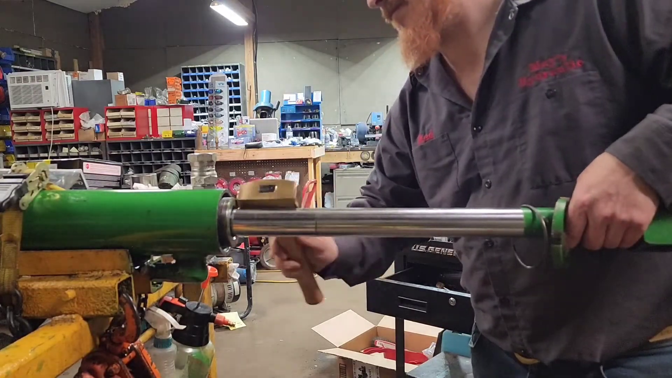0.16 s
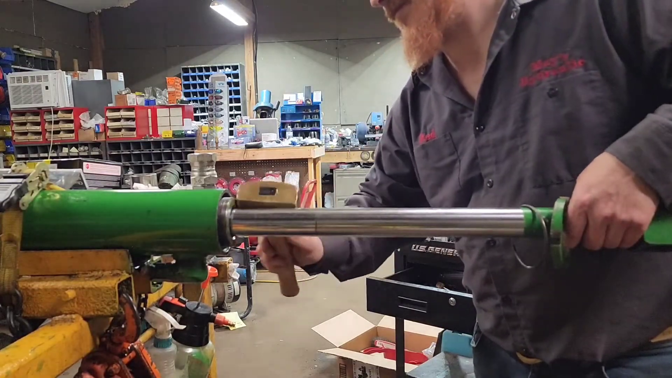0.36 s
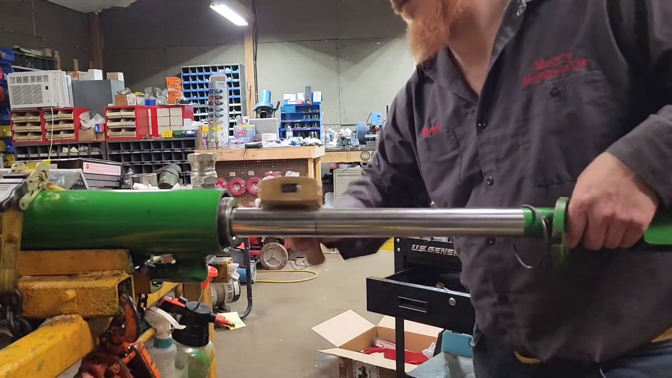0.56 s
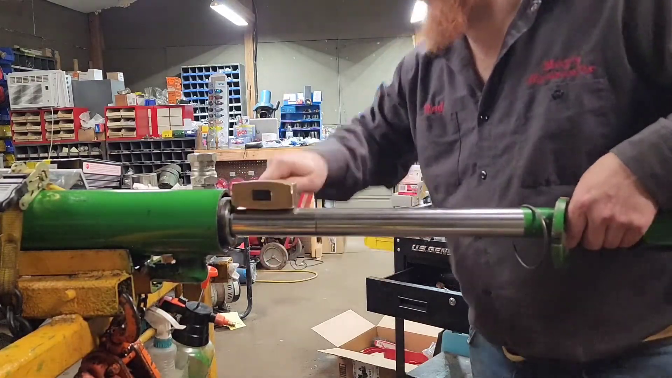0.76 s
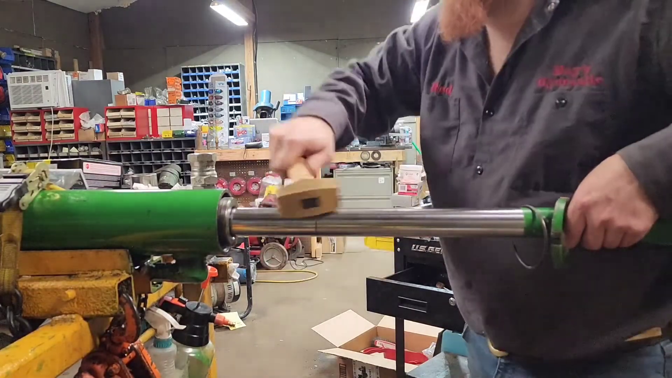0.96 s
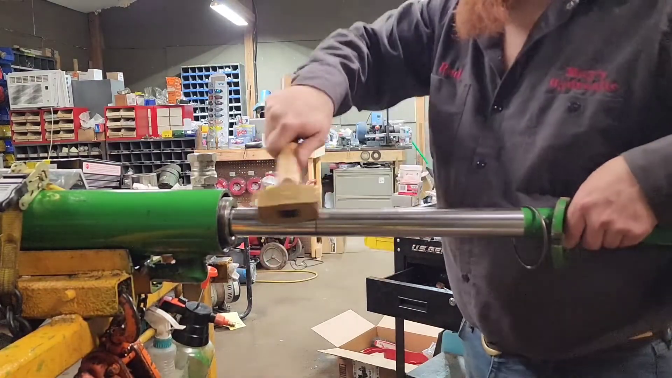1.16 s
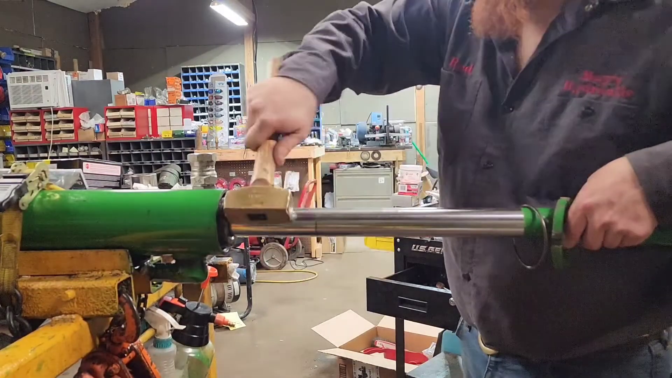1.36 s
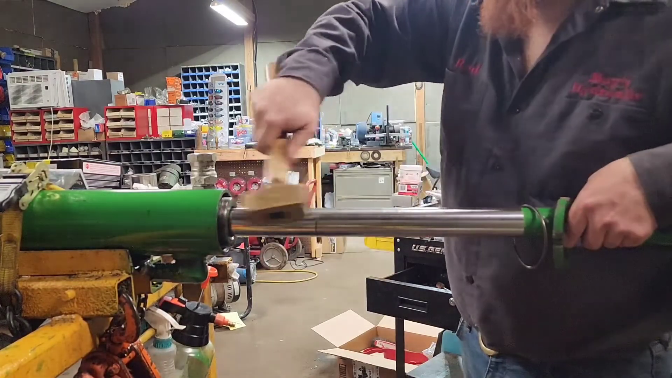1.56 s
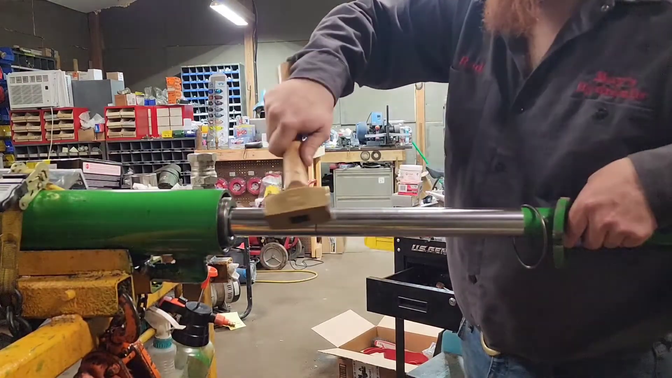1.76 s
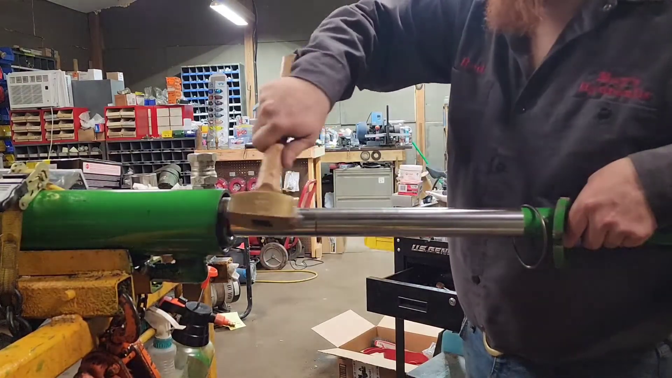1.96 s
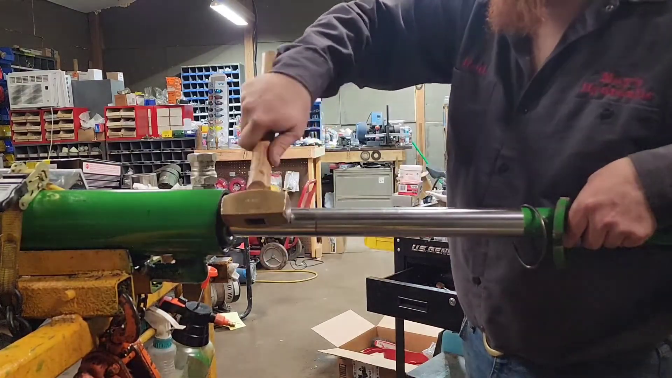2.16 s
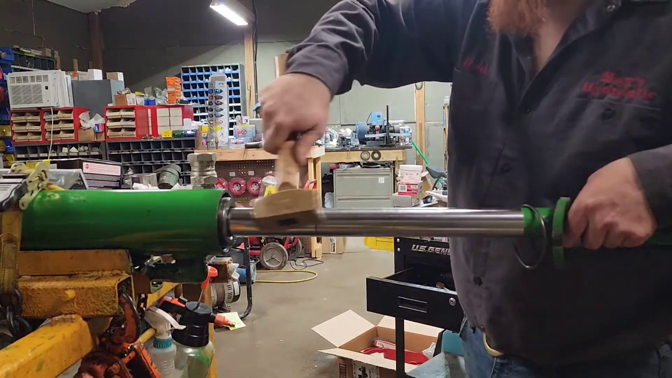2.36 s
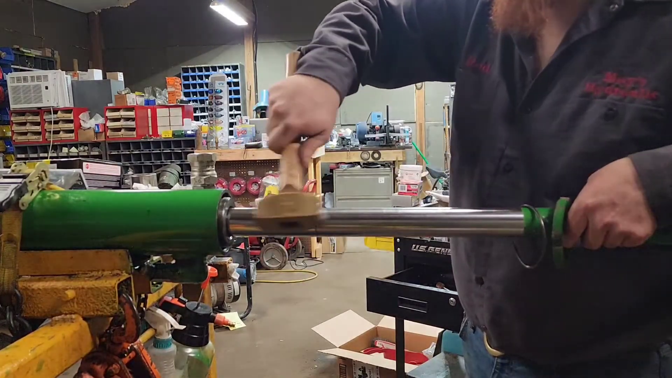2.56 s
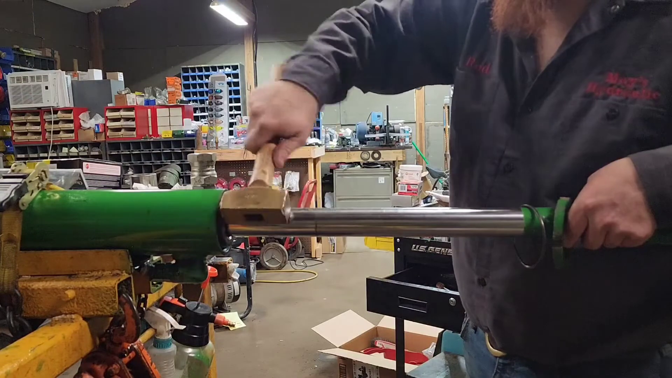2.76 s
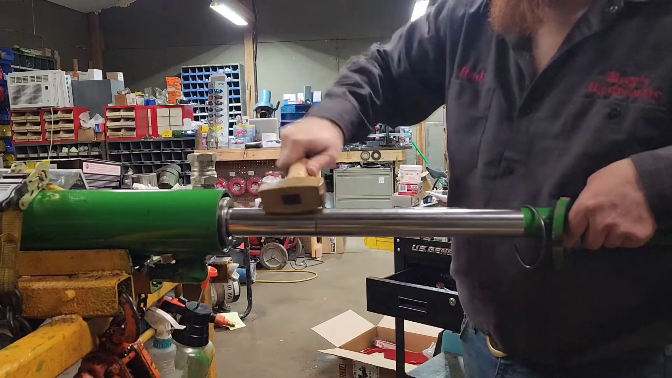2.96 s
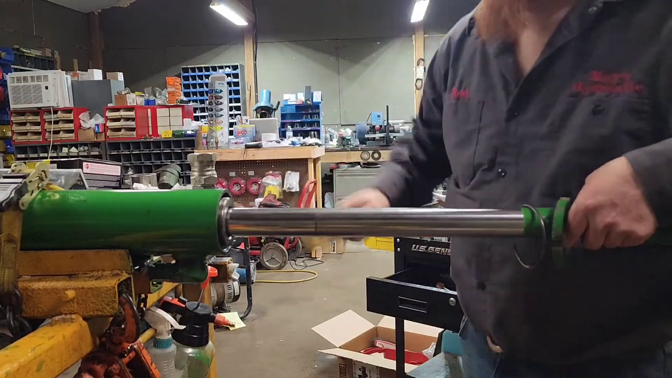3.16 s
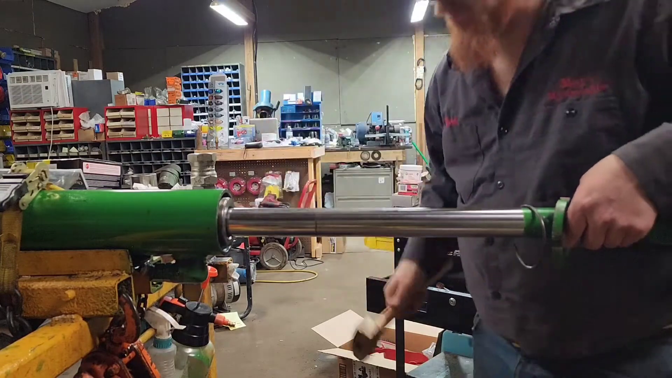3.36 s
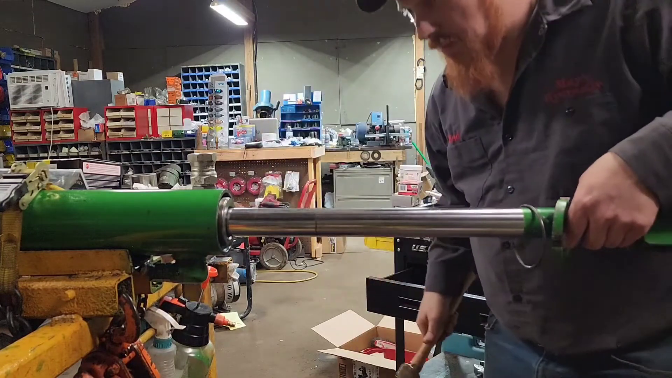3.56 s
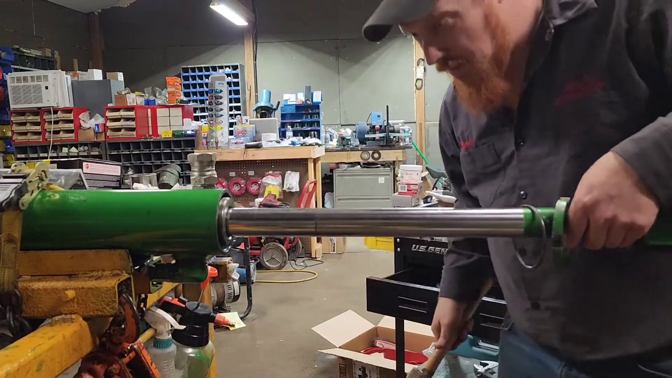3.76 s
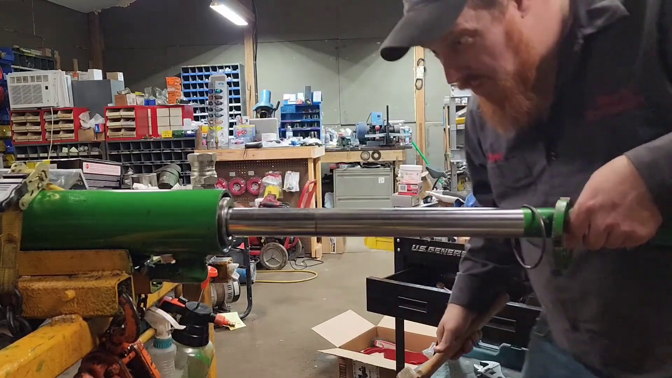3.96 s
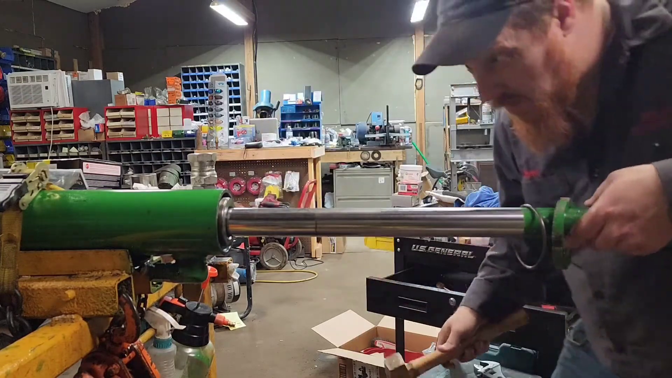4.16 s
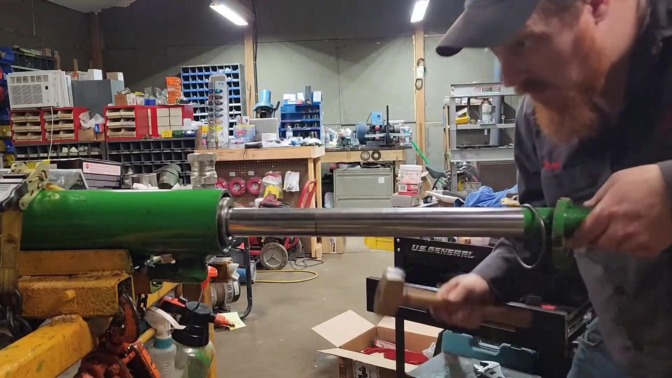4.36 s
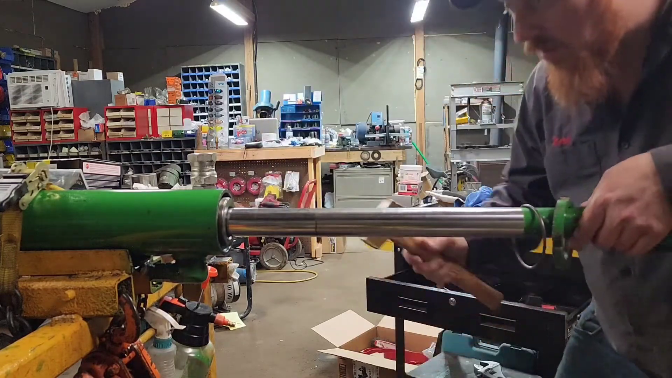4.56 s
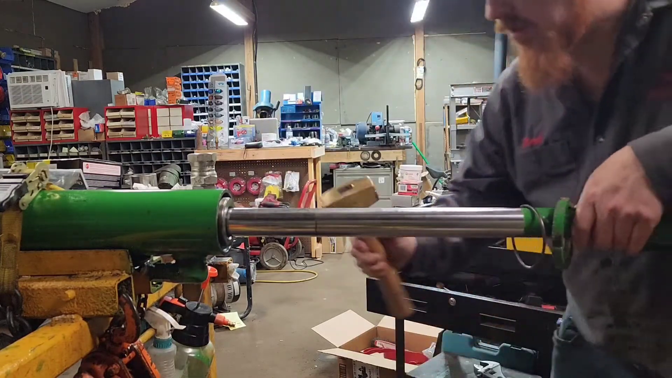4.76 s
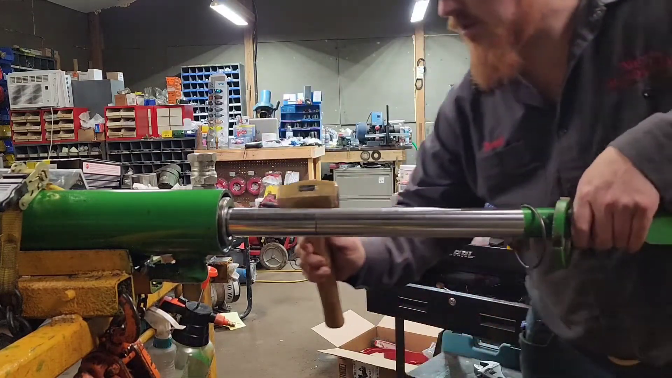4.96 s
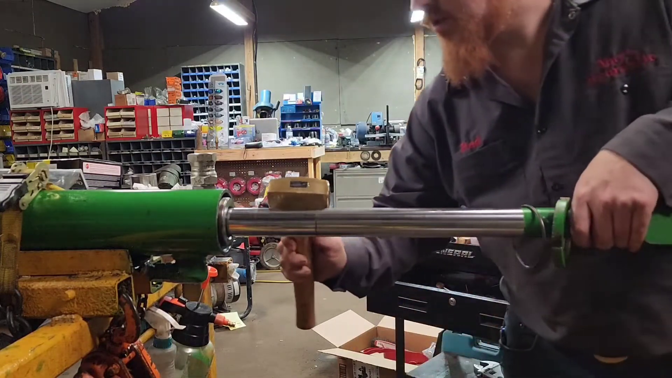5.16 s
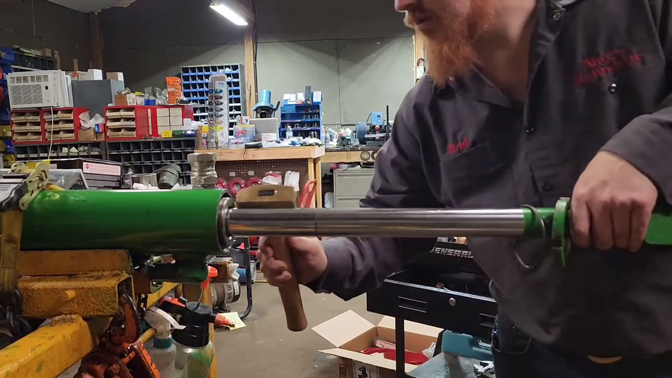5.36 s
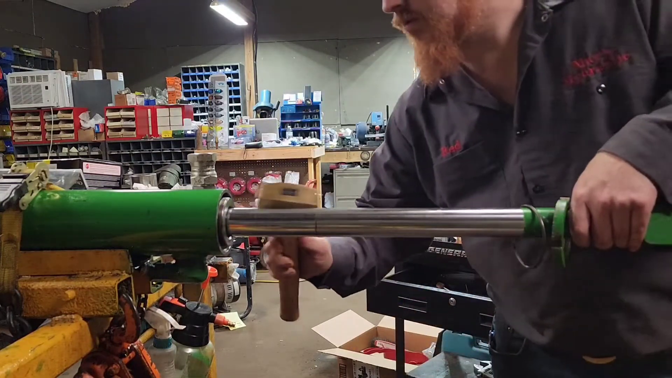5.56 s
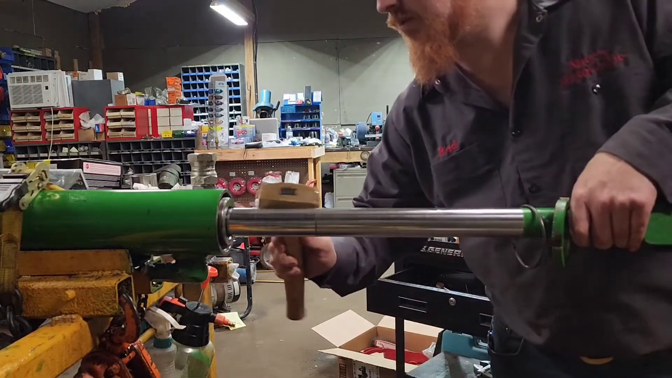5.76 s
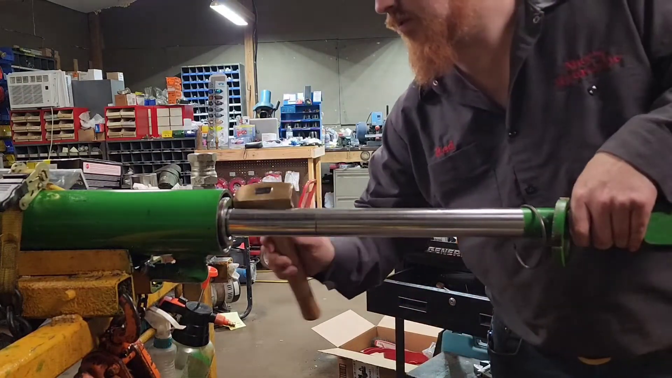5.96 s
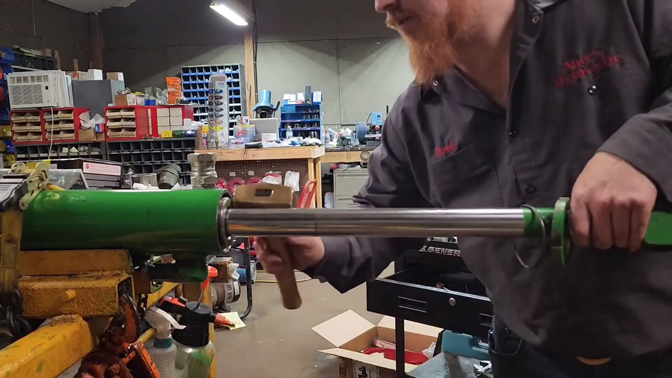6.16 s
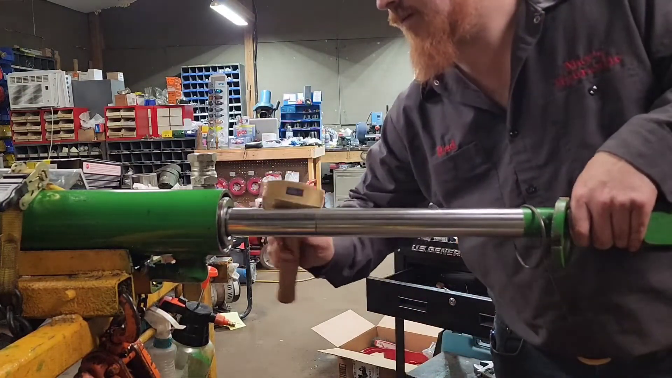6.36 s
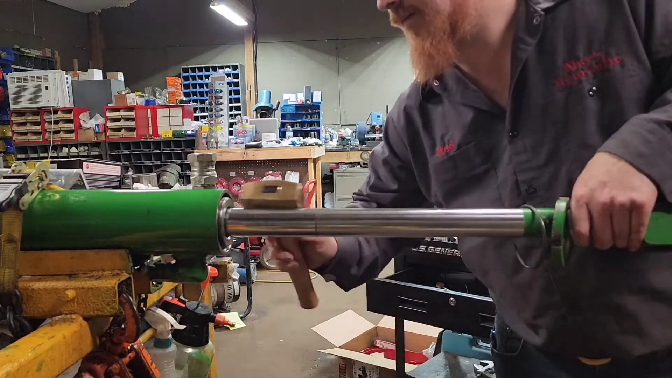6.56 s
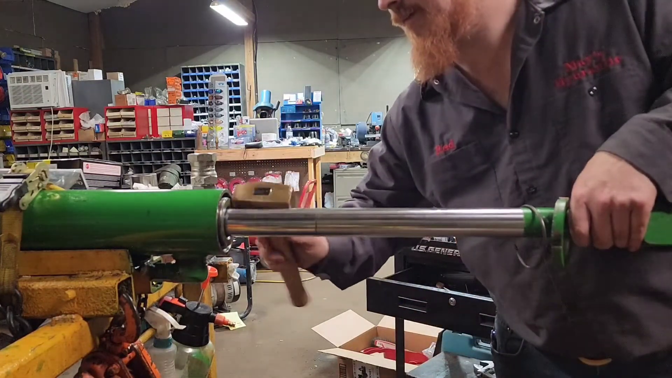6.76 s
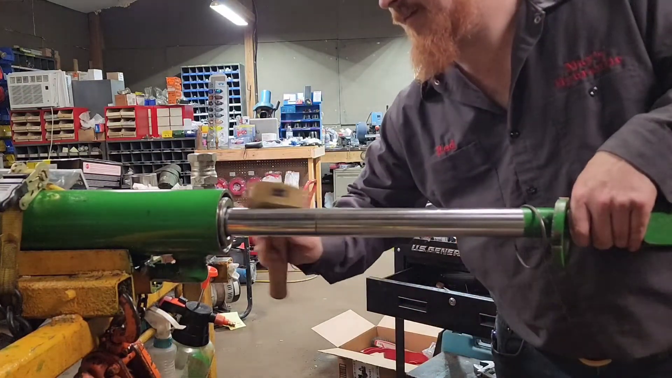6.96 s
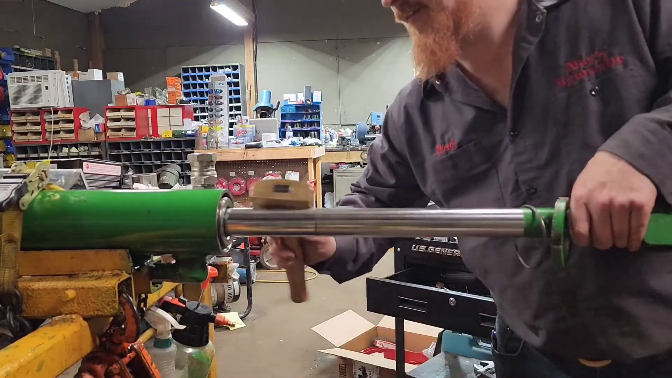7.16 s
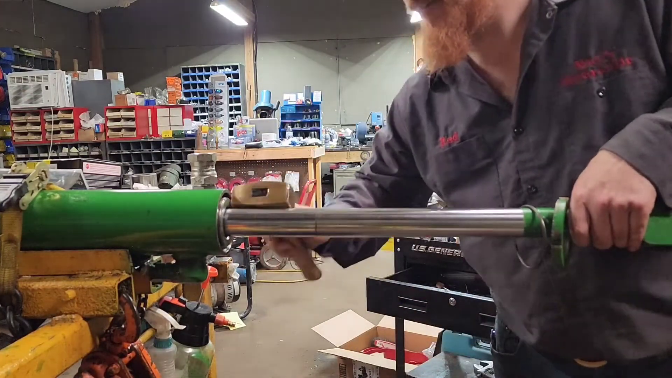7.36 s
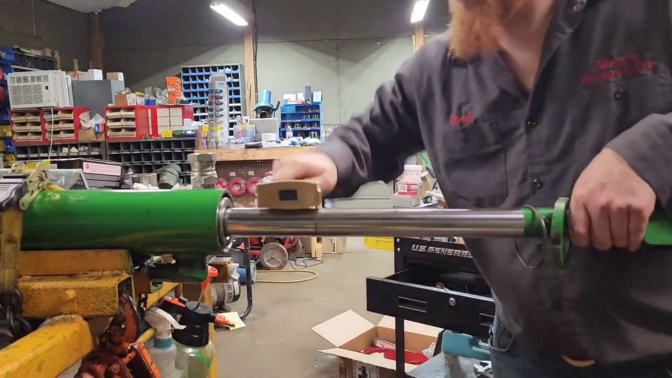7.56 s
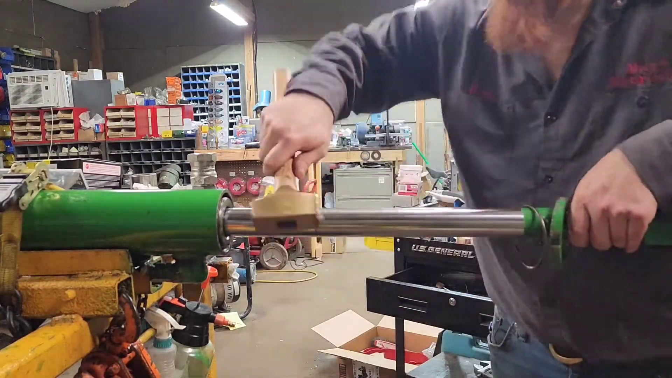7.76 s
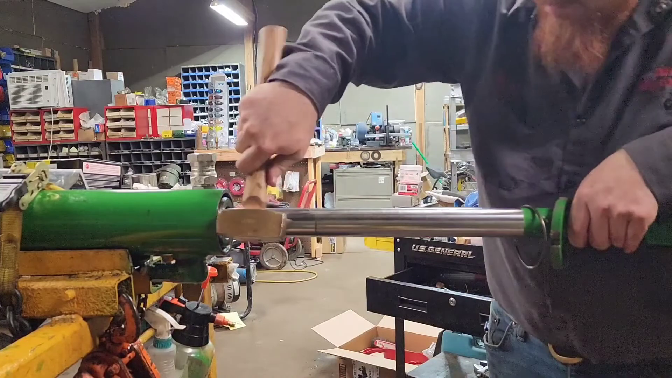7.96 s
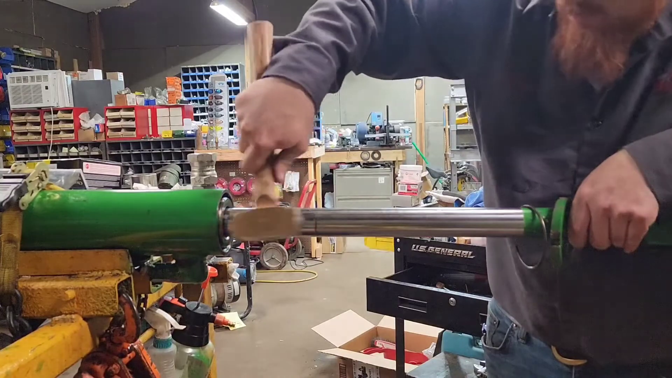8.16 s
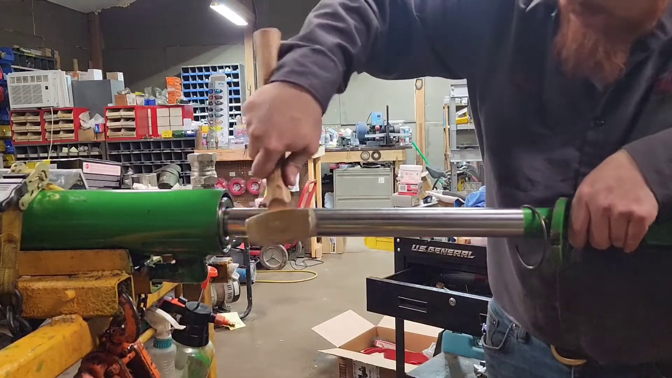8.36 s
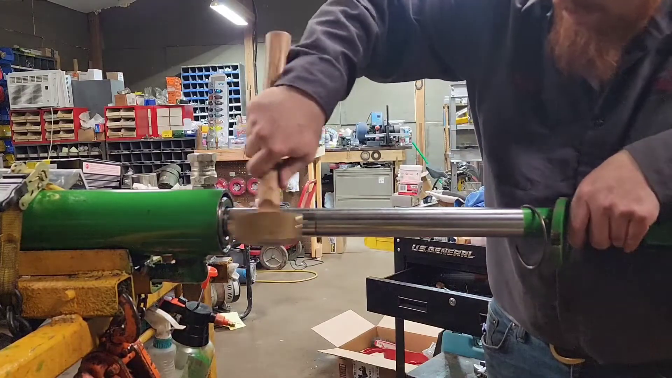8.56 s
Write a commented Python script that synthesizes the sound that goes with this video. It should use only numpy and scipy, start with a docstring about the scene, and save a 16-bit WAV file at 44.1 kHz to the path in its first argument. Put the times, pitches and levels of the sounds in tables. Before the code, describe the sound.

A brass hammer taps a clamped steel cylinder rod in two steady runs of hard ringing cracks, then three softer blows, in a humming workshop.

```python
"""In a large workshop, a brass hammer taps a hydraulic cylinder held in a vice, sliding along the piston rod.
There are two runs of quick blows, then three more; between the runs the head clinks once on the rod.
Each blow is a hard crack (short swinging tones), a clang of barrel and vice (dense noise bands and
long fading tones) and the wash of the room (slower noise bands), with a flutter echo between the walls.
Steady tones make the hum of motors and mains, filtered noise makes the moving air."""
import sys
import numpy as np
from scipy import signal
from scipy.fft import rfft, irfft
from scipy.io import wavfile

SR = 44100
rng = np.random.default_rng(int(sys.argv[2]) if len(sys.argv) > 2 else 0)


def int16_out(signal):
    """Quantize to a 16-bit WAV file."""
    q = np.round(np.clip(np.atleast_2d(signal).T, -1, 1) * 32767)
    wavfile.write(sys.argv[1], SR, q.astype(np.int16))


N = 383669
RING = int(.8 * SR)  # samples in one blow
AGE = np.arange(RING) / SR  # seconds since the blow


def from_db(db):
    """Turn decibels into a plain multiplier."""
    return 10 ** (np.asarray(db) / 20)


def at_hz(points, hz):
    """Read every column of a table at the given pitch, on a log-frequency axis."""
    known_hz, *columns = np.transpose(points)
    log_hz = np.log(np.maximum(hz, 1))
    return np.array([np.interp(log_hz, np.log(known_hz), column) for column in columns])


def fade(t60_s):
    """Exponential decay that falls by 60 dB in t60_s seconds."""
    return np.exp(-np.log(1000) * AGE / t60_s)


def filtered(sound, order, edge_hz, kind):
    """Pass a sound through a smooth (Butterworth) filter."""
    return signal.sosfilt(signal.butter(order, edge_hz, kind, fs=SR, output="sos"), sound)


def add(out, start_s, sound):
    """Mix a sound in at a given time."""
    start = round(start_s * SR)
    out[:, start:start + sound.shape[-1]] += sound[..., :N - start]


def causal(gain_db):
    """Minimum-phase filter with the given levels: nothing sounds early."""
    cepstrum = irfft(np.log(from_db(gain_db)))
    half = len(cepstrum) // 2
    cepstrum[1:half] *= 2
    cepstrum[half + 1:] = 0
    return np.exp(rfft(cepstrum))


# how alike the two ears hear spread-out sound: (f/Hz, correlation)
EAR_LIKENESS = [(100, 0.86), (280, 0.8), (480, 0.49), (700, 0.41), (1100, 0.058), (2000, 0.068), (16000, 0)]


def two_ears(pair, hz):
    """Two unrelated signals become left and right, more alike in the bass."""
    alike = at_hz(EAR_LIKENESS, hz)[0]
    mid = np.sqrt((1 + alike) / 2) * pair[..., 0, :]
    side = np.sqrt((1 - alike) / 2) * pair[..., 1, :]
    return np.stack([mid + side, mid - side], axis=-2)


# steady tones of motors and mains: (f/Hz, relative level/dB)
HUM_TONES = [(27.3, -66.5), (120, -53.5), (134.9, -54.5), (184, -81), (269.8, -66), (404.7, -66)]
# tone balance of moving air and hiss: (f/Hz, relative level/dB)
AIR_BALANCE = [(20, 3), (45, -5), (80, 0.5), (130, 2), (230, -1.5), (400, -3.5), (850, -5), (1250, -10.5),
               (1900, -10.5), (2800, -22.5), (3800, -17), (5200, -26.5), (10000, -28.5), (12000, -14.5),
               (15500, -27)]


def background(hum_db=-1.5, air_db=-50):
    """Steady motor tones, close enough to beat, lie over a steady rush of noise shaped like moving air."""
    hz, t = np.fft.rfftfreq(N, 1 / SR), np.arange(N) / SR
    noise = two_ears(rfft(rng.standard_normal((2, N))), hz)
    air = irfft(noise * from_db(at_hz(AIR_BALANCE, hz)), N)
    hum = np.zeros(N)
    for tone_hz, level_db in HUM_TONES:
        hum += np.sqrt(2) * from_db(level_db) * np.sin(2 * np.pi * (tone_hz * t + rng.random()))
    return from_db(air_db) * air / air.std() + from_db(hum_db) * hum


# the crowd of short modes in the metal: (f/Hz, left level/dB, right level/dB)
CLANG_LEVELS = [(89, 7, 11), (272, 21.5, 17.5), (480, 19.5, 16), (696, 22.5, 13.5), (935, 29.5, 25),
                (1410, 20.5, 20), (2330, 17.5, 19), (3920, 14.5, 20), (4500, 12, 4), (5360, 13, 3.5),
                (6600, 11, 10.5), (8900, -43, -47), (10400, 18, 8), (14300, -20, -8)]
# the workshop's answer: (f/Hz, left level/dB, right level/dB, decay by 60 dB t60/s)
ROOM_WASH = [(40, 4, 12, 0.93), (63.6, 18, 15.5, 0.26), (134, 9, 9, 0.86), (267, 19.5, 18.5, 0.53),
             (435, 12.5, 15.5, 0.36), (724, 27.5, 26, 0.4), (930, 28.5, 25.5, 0.46), (1420, 20, 20.5, 0.48),
             (1970, 19.5, 22, 0.53), (3760, 14.5, 18.5, 0.56), (5560, 13.5, 3.5, 0.44),
             (10000, -9, -17, 0.19), (11400, -21, 6.5, 0.33), (15000, -38, -1.5, 0.12)]


def dense_ring(clang_t60_s=0.24, room_rise_s=0.0065, rise_cycles=0.8, count=27):
    """Countless close modes of metal and room, made as fading noise bands; returns (metal, room)."""
    edges_hz = np.geomspace(35, 17000, count + 1)
    white = rng.standard_normal((2, 2, 2, RING))  # two noises in turn, metal or room, two signals
    out = np.zeros((2, 2, RING))
    clump_db, clumps_s = 1.6, np.arange(0, AGE[-1], .014)
    for k, (low, high) in enumerate(zip(edges_hz, edges_hz[1:])):
        hz = np.sqrt(low * high)
        *room_db, room_t60_s = at_hz(ROOM_WASH, hz)
        # the bass fills the room last
        build = 1 - np.exp(-AGE / (room_rise_s + rise_cycles / hz))
        # reflections arrive in bunches
        bunches = np.interp(AGE, clumps_s, rng.standard_normal(len(clumps_s)))
        room_shape = build * from_db(clump_db * bunches) * fade(room_t60_s)
        shape = np.array([fade(clang_t60_s), room_shape])[:, None]
        band = filtered(two_ears(white[k % 2], hz) * shape, 2, [low, high], "band")
        # energy in step with bandwidth, so the tables alone set the balance
        energy = np.sum(band ** 2, axis=-1, keepdims=True)
        band *= np.sqrt(2 * (high - low) / SR / energy)
        out += band * from_db([at_hz(CLANG_LEVELS, hz), room_db])[..., None]
    return out


# faint knocks and rebounds as the hammer is handled: (t/s, level/dB, centre f/Hz, width/octaves)
HANDLING_KNOCKS = [(1.432, -5.5, 3000, 1.3), (3.812, -29, 5300, 0.91), (4.526, -20, 1600, 5.8),
                   (5.479, -11, 1110, .4), (7.552, -16, 1110, 0.26), (7.99, -6, 3570, 0.83),
                   (8.565, -12, 1698, 3)]


def knocks(damped_t60_s=0.055, room_db=-10, rise_s=0.0011):
    """Light nudges and rebounds, damped by the resting head; each stirs part of the metal's range."""
    out = np.zeros((2, N))
    metal, room = dense_ring()
    rise = 1 - np.exp(-AGE / rise_s)
    sound = (metal * fade(damped_t60_s) + from_db(room_db) * room) * rise
    for start_s, level_db, hz, octaves in HANDLING_KNOCKS:
        edges_hz = np.clip(hz * 2 ** (np.array([-.5, .5]) * octaves), 20, .45 * SR)
        add(out, start_s, from_db(level_db) * filtered(sound, 2, edges_hz, "band"))
    return out


# modes of the hammer head touching the rod: (f/Hz, relative level/dB, decay by 60 dB t60/s)
HEAD_MODES = [(635, -38, 0.071), (1105, -33.5, 0.072), (1570, -25.5, 0.019), (1970, -25.5, 0.029),
              (3170, -31, 0.016), (3440, -39, 0.16), (3510, -21.5, 0.028), (3600, -47, 0.29)]
# light touches of the head on the rod: (t/s, level/dB)
HEAD_CLINKS = [(5.0953, 3.5)]


def clinks(clink_room_db=-27, clink_stir_db=-21, clink_top_hz=4300):
    """The head's own modes ring softly on the rod and barely stir the rest of the metal."""
    out = np.zeros((2, N))
    metal, room = dense_ring()
    head = np.zeros(RING)
    for k, (hz, level_db, t60_s) in enumerate(HEAD_MODES):
        head += (-1) ** k * from_db(level_db) * fade(t60_s) * np.sin(2 * np.pi * hz * AGE)
    in_room = signal.fftconvolve(room, head[None], axes=1)[:, :RING]
    stir = filtered(metal + room / 2, 1, 1000, "high")
    clink = head + from_db(clink_room_db) * in_room + from_db(clink_stir_db) * stir
    clink = filtered(clink, 3, clink_top_hz, "low")
    for start_s, level_db in HEAD_CLINKS:
        add(out, start_s, from_db(level_db) * clink)
    return out


def flutter(sound, lag_s=0.14, echo_db=-25, again_db=-10, low_hz=850, high_hz=1300):
    """The middle of the sound comes back twice from the far walls."""
    middle = filtered(sound + 1e-18, 2, [low_hz, high_hz], "band")
    out = np.zeros((2, N))
    add(out, lag_s, from_db(echo_db) * middle)
    add(out, 2 * lag_s, from_db(echo_db + again_db) * middle)
    return out


def near_echoes(sound, lags_s, vice_s=.0047, vice_db=-9, shelves_db=-13, shelves_t60_s=0.37):
    """The crack returns from the vice, then from floor, benches and shelves, at other moments for each ear."""
    out = sound + from_db(vice_db) * np.roll(sound, round(vice_s * SR), axis=1)
    for ear in range(2):
        for k, lag_s in enumerate(lags_s[ear]):
            gain = (-1) ** k * from_db(shelves_db) * 1000 ** (-lag_s / shelves_t60_s)
            out[ear] += gain * np.roll(sound[ear], round(lag_s * SR))
    return out


def thin_modes(modes_db=-55, t60_s=0.2, low_hz=2500, high_hz=15000, count=26):
    """Thin fading tones scattered through the treble."""
    hz = np.exp(rng.uniform(np.log(low_hz), np.log(high_hz), count))
    phase = rng.uniform(0, 2 * np.pi, (2, count, 1))
    gain = from_db(modes_db + at_hz(CLANG_LEVELS, hz))[..., None]
    tones = gain * np.sin(2 * np.pi * hz[:, None] * AGE + phase)
    return fade(t60_s) * np.sum(tones, axis=1)


# modes of barrel, rod and vice:
# (f/Hz, decay by 60 dB t60/s, level struck from the side/dB, level struck from above/dB)
BARREL_MODES = [(213, 0.25, -36, -35), (295.7, 0.23, -33, -20), (413, 0.3, -30.5, -61),
                (620.5, 0.5, -32.5, -40), (693, 0.44, -49, -28.5), (810, 0.1, -42, -29),
                (886, 0.23, -55, -21), (932, 0.54, -26.5, -53), (1004, 0.63, -26.5, -43),
                (1055, 0.29, -27.5, -22.5), (1100, 0.11, -48, -12), (1086, 0.24, -25, -19.5),
                (1153, 0.45, -25.5, -39), (1406, 0.18, -24, -55), (1466, 0.27, -23.5, -29.5),
                (1764, 0.18, -29, -24), (1893, 0.42, -30, -31), (2240, 0.5, -38, -35),
                (2190, 0.36, -40, -37), (2380, .28, -50, -29), (3350, 1.33, -46.5, -52),
                (3550, 0.31, -32.5, -38), (3524, 0.42, -34, -39), (9800, 0.2, -67, -44),
                (13400, 0.22, -60, -55)]


def barrel(grip, flank, phases, scatter_db=3.0, flank_db=-7):
    """The long modes; the blow decides how strongly each rings, and on the rod's flank they are weaker."""
    out = np.zeros((2, RING))
    for (hz, t60_s, side_db, above_db), phase in zip(BARREL_MODES, phases):
        level_db = side_db + grip * (above_db - side_db) + flank * flank_db
        level_db += scatter_db * rng.standard_normal()
        out += from_db(level_db) * fade(t60_s) * np.sin(2 * np.pi * hz * AGE + phase[:, None])
    return out


# broad resonances of the crack, straight from the contact:
# (f/Hz, width/Hz, left level/dB, right level/dB, extra level when struck from above/dB)
CRACK_RESONANCES = [(329, 240, 17, 9, -1.5), (695, 450, 9.5, -3, 10), (1086, 122, 27, 20, -1.5),
                    (1480, 260, 7.5, 9, 8), (2160, 350, 20.5, 23, 1.5), (2410, 150, 17.5, 23, 0.5),
                    (3530, 280, 21, 30, -5), (4550, 380, 28, 14.5, -0.5), (6780, 2200, 18, 10, -6),
                    (10940, 78, -11, 12.5, 0), (12970, 280, -13, 11.5, 1.5)]


def crack(grip, right_lag_s=0.00015, contact_s=0.00049, rise_scatter=0.1):
    """Broad resonances swell while the soft brass is in contact, reaching the left ear first."""
    out = np.zeros((2, RING))
    age = np.maximum(AGE - np.array([[0], [right_lag_s]]), 0)
    rise_s = contact_s * np.exp(rise_scatter * rng.standard_normal())
    press = 1 - np.exp(-age / rise_s)
    for k, (hz, width_hz, left_db, right_db, above_db) in enumerate(CRACK_RESONANCES):
        detune, stray_db = rng.normal([1, 0], [.025, 1.8])  # no two blows are quite alike
        swing = np.sin(2 * np.pi * hz * detune * age) * np.exp(-np.pi * width_hz * age)
        gain = from_db(np.array([[left_db], [right_db]]) + grip * above_db + stray_db)
        out += (-1) ** k * 2 * np.pi * width_hz / SR * gain * swing
    return press * out


# how the hand holds the hammer: (t/s, grip 0 = from the side .. 1 = from above,
# place of the head 0 = on top of the rod .. 1 = on its flank)
HAMMER_POSE = [(0, 0.06, 0.19), (0.698, 0.11, 0), (1.3, 0.78, 0.05), (1.85, 0.84, 0.21), (2.7, 0.87, 0),
               (5.1, 0.093, 0.3), (7.3, 0.088, 0.075), (7.9, 0.84, 1), (8.7, 0.92, 0.76)]


def pose_at(time_s):
    """Grip and place of the head at one moment, gliding between the listed poses."""
    known_s, *columns = np.transpose(HAMMER_POSE)
    return [np.interp(time_s, known_s, column) for column in columns]


# how the pose colours a blow: (f/Hz, level when gripped from above/dB, level on the flank/dB)
POSE_TONE = [(120, -1, 3), (298, -0.1, 3), (695, -1.5, 6.5), (1050, 0, 1.5), (2180, -1.36, 6),
             (3750, -1.1, 5.5), (5200, -1, -5.5), (7100, -0.9, 1), (12000, -0.3, 0.5)]


def contact_colour(hz, hardness_db, grip, flank, hardness_hz=4240, scuff_hz=9100, steepness=4.6,
                   edge_octaves_per_db=0.01):
    """A soft contact loses its treble; grip and place of the head shift the weight of the knock. In dB."""
    def above(edge_hz):
        """Smooth step from 0 below the edge to 1 above it."""
        return 1 - 1 / (1 + (hz / edge_hz) ** steepness)
    grip_db, flank_db = at_hz(POSE_TONE, hz)
    # a softer contact lasts longer, so its edge lies lower
    edge_hz = hardness_hz * 2 ** (edge_octaves_per_db * hardness_db)
    # on the flank the head scuffs, which keeps the sizzle above scuff_hz
    treble = above(edge_hz) * (1 - flank * above(scuff_hz))
    return hardness_db * treble + grip * grip_db + flank * flank_db


# the blows: (t/s, level/dB, crack level/dB, hardness of the contact as treble level/dB)
BLOWS = [(0.0599, 0.2, -4, 4.5), (0.3534, 0.54, -4, 2), (0.7084, -2, 3, -5), (1.0209, 1.7, -5, -1),
         (1.309, 2, -5, 0), (1.5815, 2, -3, 2), (1.8594, 0.55, 1, 1.5), (2.1296, 1.5, -4.5, 0.5),
         (2.4018, 0.9, 0.3, 0.5), (2.6935, 2, -2, 1), (5.3255, -8, 3.5, -15.5), (5.604, -1.7, 2, -6.5),
         (5.8757, 0.8, -6, 1.5), (6.1507, 1, -4, 1), (6.4293, 0.5, -3, 0.5), (6.698, 1, -6, 0.5),
         (6.98, 0.5, -2.5, 0.5), (7.2481, 1.25, -2.5, 0.5), (7.9606, -8, 7, -19), (8.1878, -5, 3.5, -9.5),
         (8.438, -3, 3, -6)]


def hammer_blows(change=0.3, crack_db=2.5, ring_db=-1.21, spread_s=0.00027, count=4, size=12):
    """Each blow joins crack and ring; blows with one grip ring alike, but each lands a little differently."""
    out = np.zeros((2, N))
    rings = [dense_ring().sum(axis=0) + thin_modes() for _ in range(count + 2)]
    from_side, from_above, *strays = rings
    # the less alike the ears are at a mode's pitch, the further out of step it reaches them
    modes = len(BARREL_MODES)
    alike = at_hz(EAR_LIKENESS, np.array(BARREL_MODES)[:, 0])[0]
    apart = np.arccos(alike) * rng.choice([-1, 1], modes)
    phases = rng.uniform(0, 2 * np.pi, (modes, 1)) + np.outer(apart, [0, 1])
    lags_s = rng.uniform(.008, .13, (2, size))
    swell = 1 - np.exp(-AGE / spread_s)  # the shock takes a moment to spread through the steel
    hz = np.fft.rfftfreq(RING, 1 / SR)
    for start_s, level_db, sharp_db, hardness_db in BLOWS:
        grip, flank = pose_at(start_s)
        angle = grip * np.pi / 2
        usual = np.cos(angle) * from_side + np.sin(angle) * from_above
        miss = rng.standard_normal(count)
        stray = np.tensordot(miss / np.linalg.norm(miss), strays, 1)
        # "change" is the share of energy that is new in each blow
        ring = np.sqrt(1 - change) * usual + np.sqrt(change) * stray
        metal = swell * (from_db(ring_db) * ring + barrel(grip, flank, phases))
        blow = from_db(crack_db + sharp_db) * near_echoes(crack(grip), lags_s) + metal
        colour_db = level_db + contact_colour(hz, hardness_db, grip, flank)
        add(out, start_s, irfft(rfft(blow) * causal(colour_db), RING))
    return out


def scene():
    """The workshop's hum, small handling sounds, and the blows with their echoes."""
    blows = hammer_blows()
    return background() + knocks() + clinks() + flutter(blows) + blows


def record(dry):
    """The highest peaks are rounded and the top above 16 kHz is cut."""
    ceiling = 1.1
    low_pass = signal.ellip(10, .1, 90, 16000, fs=SR, output="sos")
    return signal.sosfilt(low_pass, ceiling * np.tanh(dry / ceiling))


dry = scene()
out = record(dry)
int16_out(out)
```